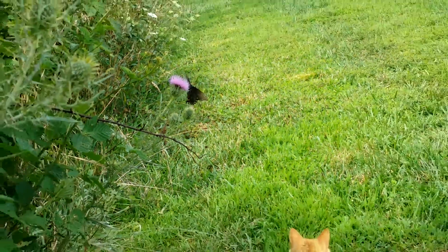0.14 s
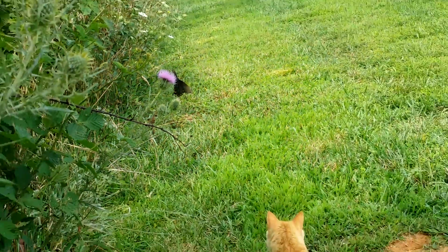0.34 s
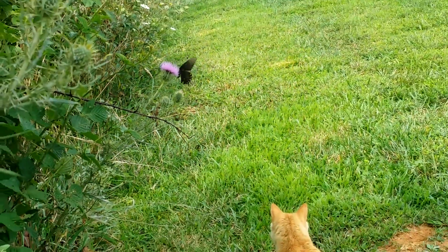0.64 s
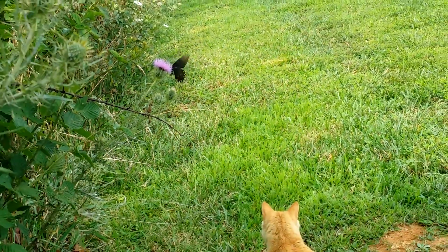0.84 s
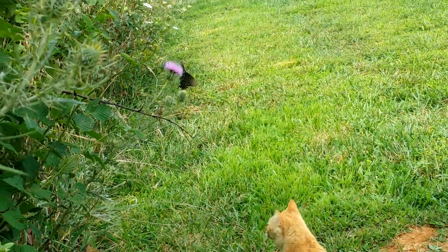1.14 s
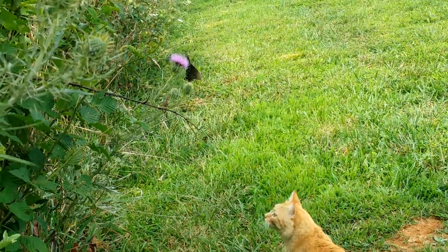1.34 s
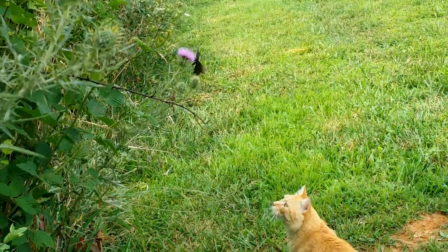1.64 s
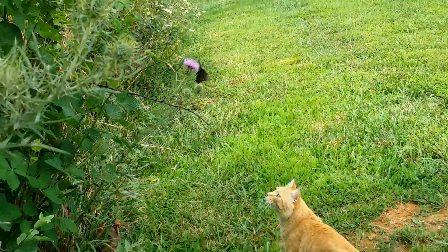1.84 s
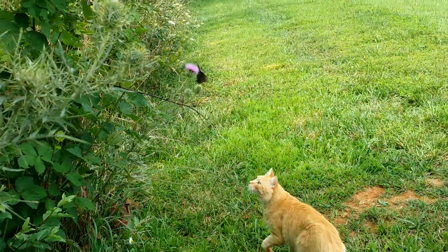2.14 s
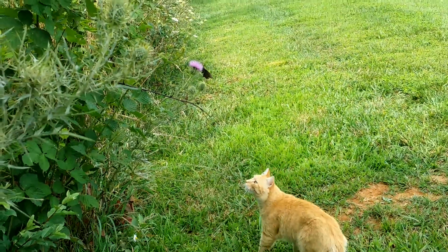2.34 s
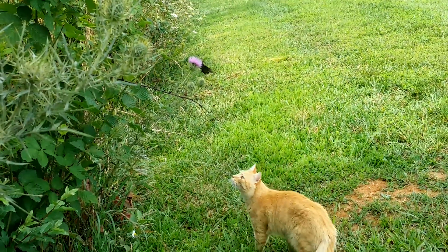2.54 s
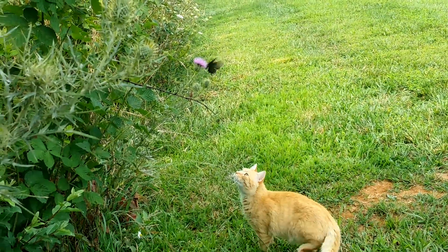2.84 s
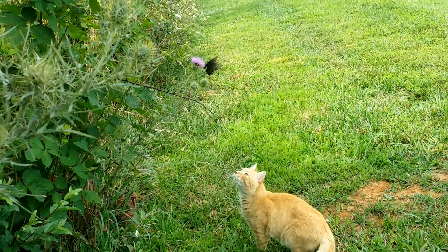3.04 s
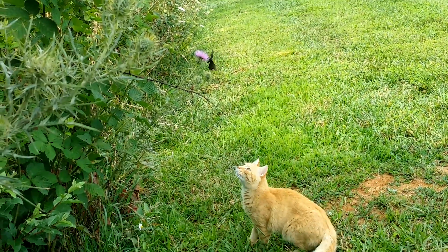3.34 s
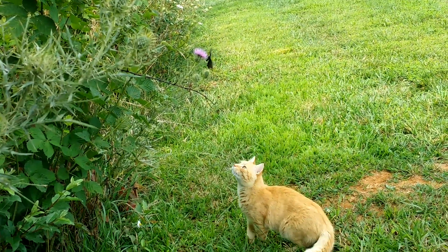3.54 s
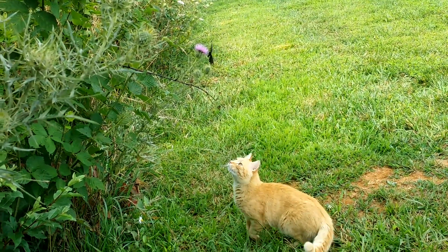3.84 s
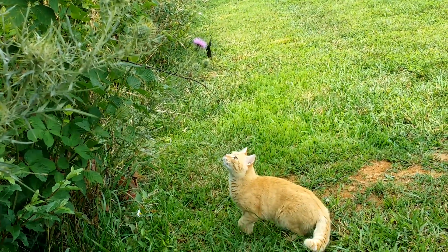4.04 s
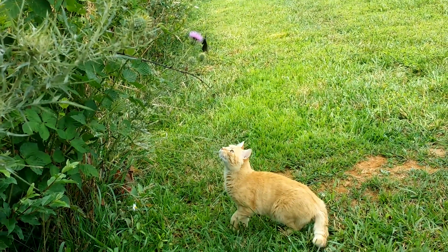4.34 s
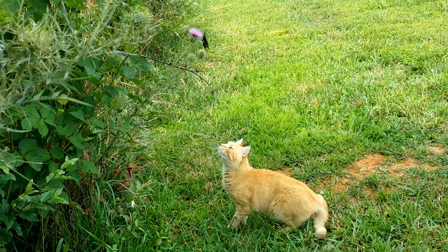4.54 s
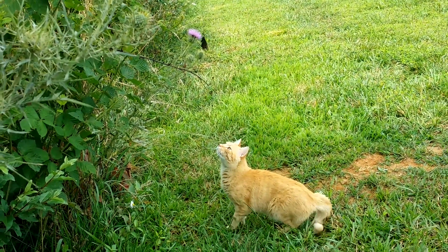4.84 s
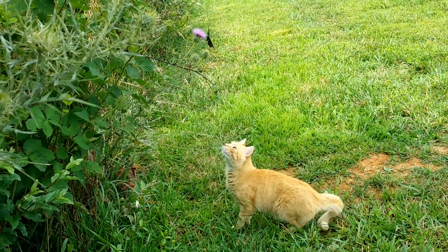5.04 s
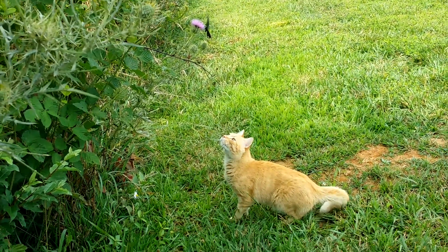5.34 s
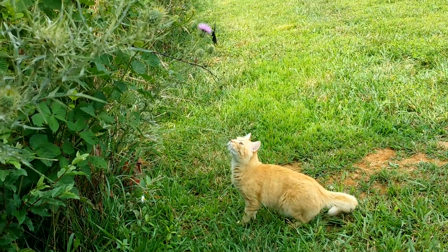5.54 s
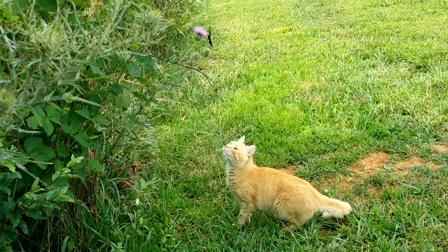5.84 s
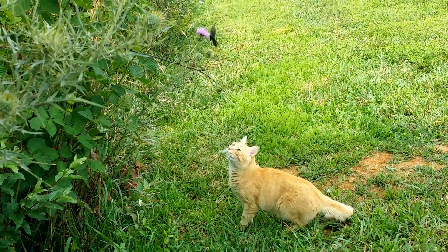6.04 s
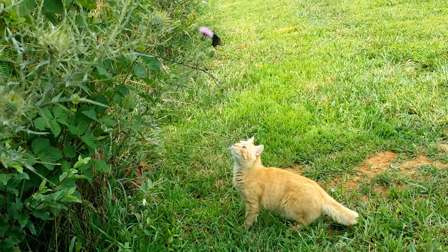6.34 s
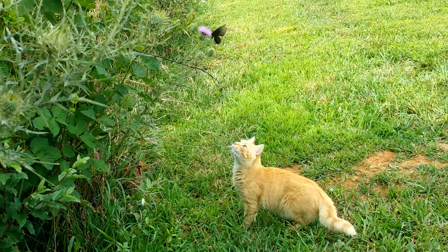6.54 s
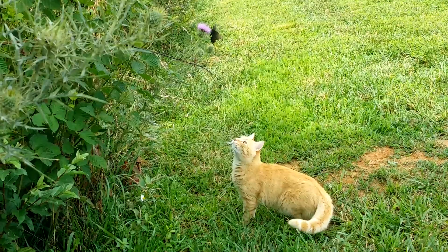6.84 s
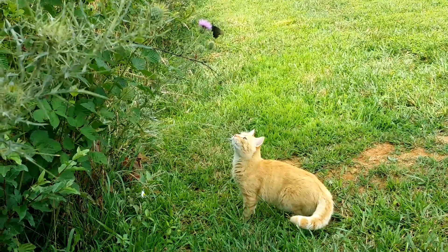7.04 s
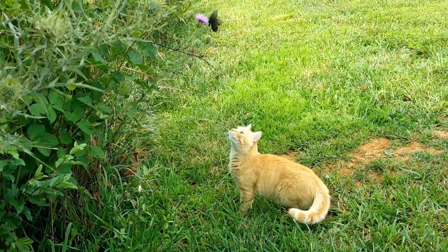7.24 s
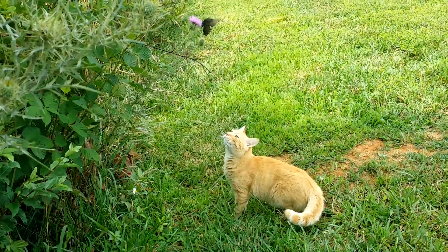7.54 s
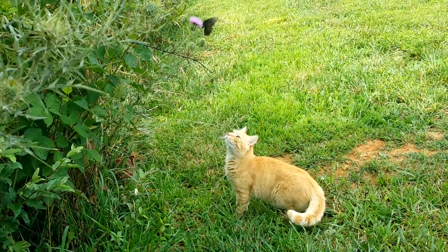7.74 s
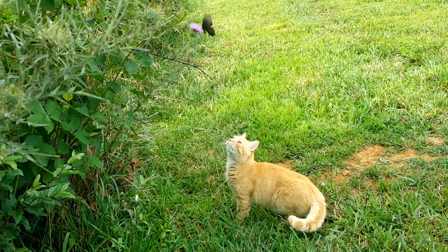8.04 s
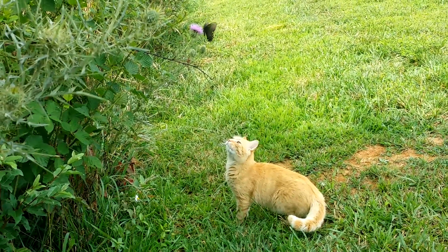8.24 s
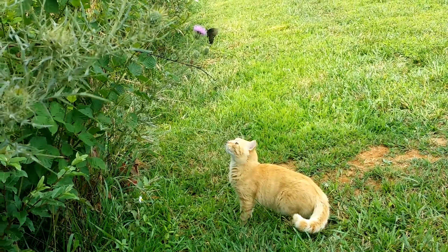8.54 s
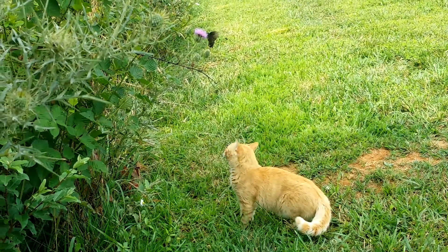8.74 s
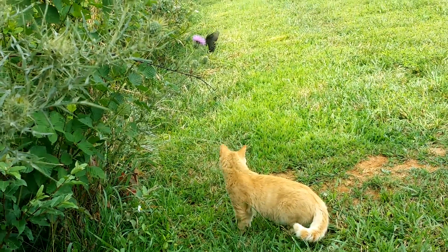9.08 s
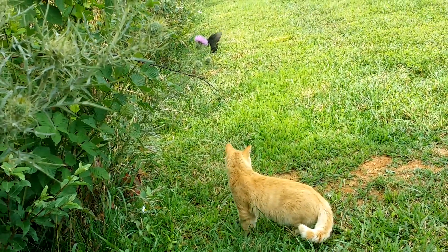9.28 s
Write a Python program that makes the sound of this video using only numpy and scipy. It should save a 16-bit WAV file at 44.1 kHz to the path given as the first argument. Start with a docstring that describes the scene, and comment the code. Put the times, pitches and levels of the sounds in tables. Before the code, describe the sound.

Shimmering summer insects drone steadily outdoors while a bird squeaks and mews on the right, thin calls follow, and a few dry clicks knock nearby.

```python
"""A dense chorus of far insects and a near cricket's trill open a summer backyard; cicadas throb in the trees.
A bird mews in the hedge on the right after a short squeak, others give thin high calls, and dry leaves rustle.
The hand-held camera clicks a few times beside its right microphone; a far engine hums under the low air noise.
Insects in mass, leaves and air are shaped noise; crickets, birds and motors are wavering tones; clicks are pulses."""
import sys
import numpy as np
from scipy import signal
from scipy.fft import rfft, irfft, next_fast_len
from scipy.io import wavfile
from scipy.ndimage import uniform_filter1d, map_coordinates

SR = 44100
rng = np.random.default_rng(int(sys.argv[2]) if len(sys.argv) > 2 else 0)


def dump_mix(stems):
    """Bounce the given channels to the path in sys.argv[1] as a 16-bit WAV at rate SR."""
    frames = np.atleast_2d(stems).T  # one column per channel
    limited = np.clip(frames, -1, 1)  # hard clip at full scale
    pcm = np.round(limited * 32767).astype(np.int16)
    wavfile.write(sys.argv[1], SR, pcm)


N = 414981
TIME = np.arange(N) / SR  # seconds


def amp(db):
    """Decibels to gain."""
    return 10 ** (np.asarray(db) / 20)


def unit(x):
    """Scale to rms 1."""
    return x / np.sqrt(np.mean(x ** 2) + 1e-20)


def since(start):
    """Seconds since a moment, 0 before it."""
    return np.maximum(TIME - start, 0)


def along(points, hz):
    """Read a list of (Hz, value) points at any frequency, on a log axis."""
    point_hz, value = np.transpose(points)
    return np.interp(np.log(hz + 1), np.log(point_hz + 1), value)


def curves(rows):
    """One value per sample for each column after the time."""
    seconds, *columns = np.transpose(rows)
    return [np.interp(TIME, seconds, column) for column in columns]


def wobble(rate):
    """A smooth random curve through random points, rate points a second."""
    knots = rng.standard_normal(int(N * rate / SR) + 4)
    fine = np.linspace(0, len(knots) - 1, 10 * len(knots))
    smooth = map_coordinates(knots, [fine], order=2)
    return np.interp(TIME * rate, fine, smooth)


def filtered(x, response):
    """Multiply the spectrum of x by a response of frequency."""
    size = next_fast_len(N + 8192)
    spectrum = rfft(x, size) * response(np.fft.rfftfreq(size, 1 / SR))
    return irfft(spectrum, size)[..., :N]


def pan(lean_db):
    """Left and right gains of mean power 1 for a left-minus-right level difference."""
    gains = amp(np.array([lean_db, -np.asarray(lean_db)]) / 2).reshape(2, -1)
    return gains / np.sqrt(np.mean(gains ** 2, axis=0))


def rush(colour, alike):
    """Stereo noise of rms 1 that falls off steeply beyond its colour; alike = left-right likeness."""
    middle, side = rng.standard_normal((2, N))
    turn = np.arccos(np.clip(alike, -1, 1)) / 2
    pair = np.cos(turn) * middle + np.sin(turn) * np.array([side, -side])
    closed = [(colour[0][0] / 2, -120), *colour, (colour[-1][0] * 2, -120)]
    return unit(filtered(pair, lambda hz: amp(along(closed, hz))))


def wavering(hz, db):
    """The tone of a far motor, unsteady in level and phase."""
    level = amp(db + 2.8 * wobble(4))
    return level * np.sin(2 * np.pi * hz * TIME + hz / 300 * wobble(22))


# How long the yard's scatter rings. Each row: frequency in Hz, time to fade by 60 dB in seconds.
YARD_FADE = [(200, 0.32), (2500, 0.7), (5000, 0.88), (8000, 0.51), (15000, 0.21)]


def yard(x):
    """Scatter from hedge and trees: fading noise, different at each microphone."""
    hz, t, cells = signal.stft(rng.standard_normal((2, SR)), SR, nperseg=256)
    fade = amp(-60 * t / along(YARD_FADE, hz)[:, None])
    tail = signal.istft(cells * fade, SR, nperseg=256)[1]
    return signal.oaconvolve(x[None], tail / np.linalg.norm(tail[0]), axes=1)[:, :N]


def foliage(x, t60):
    """Quick scatter from things around a source: noise that fades by 60 dB in t60 seconds."""
    t = np.arange(SR // 8) / SR
    tail = rng.standard_normal((2, len(t))) * amp(-60 * t / t60)
    return signal.oaconvolve(x[None], tail / np.linalg.norm(tail[0]), axes=1)[:, :N]


LEFT_LAG_S = .00045  # sound from the right reaches the left microphone later


def from_right(x):
    """The direct sound of a source on the right, at both microphones."""
    return np.array([np.roll(x, round(LEFT_LAG_S * SR)), x])


# Noise colours of the low rumble, far traffic, light breeze and hiss.
# Each row: frequency in Hz, relative level in dB per Hz.
RUMBLE_COLOUR = [(12, -26), (20, 3), (70, -1.5), (97, -6), (128, -10.5), (178, -29), (200, -24.5),
                 (260, -38), (440, -120)]
TRAFFIC_COLOUR = [(80, -41), (150, 5), (300, -2.5), (420, -2), (560, -14), (1000, -39)]
BREEZE_COLOUR = [(400, -12.5), (650, -1.5), (900, -1), (1300, -15.5), (2200, -23)]
HISS_COLOUR = [(500, -1.5), (1500, -3), (2500, 1), (4000, -1.5), (11000, -7.5), (15700, -7)]
# The breeze as it comes and goes. Each row: time in seconds, level in dB before a small lift.
BREEZE_COURSE = [(0.0, -66), (0.29, -67), (1.67, -59), (2.1, -67.5), (2.78, -63.5), (3.56, -67),
                 (3.82, -62), (5.16, -66.5), (7.08, -59.5), (7.28, -62.5), (8.57, -66), (8.99, -55),
                 (9.23, -63.5), (9.41, -66)]
# Low tones of far motors. Each row: frequency in Hz, relative level in dB.
MOTOR_TONES = [(270, -0.5), (312, -0.5), (385, -3.5)]
RUMBLE_DB, TRAFFIC_DB = -46.5, -55.5
BASS_ALIKE = .83  # left-right likeness of the rumble
# a far vehicle goes by: nearest moment, time to half power, level there
PASS_S, PASS_WIDTH_S, PASS_DB = 7.28, 0.35, -59.5
# a higher tone of the far traffic; it swings wider than the breeze that carries it (dB for each dB)
WHINE_HZ, WHINE_DB, WHINE_GROWS = 645, -68.5, 1.63


def air(breeze_lift_db=0.75, motors_db=-68, passing_motor_db=-1.5):
    """Low rumble, far traffic with one vehicle going by, a light breeze that carries a whine over, and an even hiss."""
    rumble_db = RUMBLE_DB + 0.27 * wobble(1.48) + .5 * wobble(9.8)
    rumble = amp(rumble_db) * rush(RUMBLE_COLOUR, alike=BASS_ALIKE)

    passing = amp(PASS_DB) / np.hypot(1, (TIME - PASS_S) / PASS_WIDTH_S)
    road = np.hypot(amp(TRAFFIC_DB), passing) * rush(TRAFFIC_COLOUR, alike=0.78)
    motor_level = amp(motors_db) + amp(passing_motor_db) * passing
    motors = motor_level * sum(wavering(hz, db) for hz, db in MOTOR_TONES)

    breeze_db, = curves(BREEZE_COURSE)
    breeze = amp(breeze_db + breeze_lift_db) * rush(BREEZE_COLOUR, alike=0.68) * pan(2.5)
    whine = wavering(WHINE_HZ, WHINE_DB + WHINE_GROWS * (breeze_db - breeze_db.mean()))
    hiss = amp(-54.0) * rush(HISS_COLOUR, alike=0.012) * pan(-1.1)
    return rumble + road + motors + breeze + whine + hiss


# The far engine as it swells and fades. Each row: time in seconds, level in dB before a small gain.
ENGINE_COURSE = [(0.0, -59), (0.81, -58), (3.67, -64.5), (4.19, -57.5), (5.37, -57.5), (5.84, -52.5),
                 (7.65, -50.5), (8.41, -55), (9.41, -47.5)]
# Tones of its hum. Each row: multiple of the firing rate, relative level in dB.
ENGINE_TONES = [(1, -7.5), (2, 3), (3, -12), (4, -7), (5, -20.5), (6, -23)]


def engine(firing_hz=66.44, gain_db=1.0):
    """A far engine, only the lowest multiples of its drifting firing rate carrying across the fields."""
    phase = 2 * np.pi * np.cumsum(firing_hz * (1 + 0.00609 * wobble(2))) / SR
    hum = sum(amp(db + 2.3 * wobble(2)) * np.sin(k * phase) for k, db in ENGINE_TONES)
    level_db, = curves(ENGINE_COURSE)
    return unit(hum) * amp(level_db + gain_db)


# The chorus over time. Each row: time in seconds, level in dB before a small lift.
CHORUS_COURSE = [(0, -36), (1, -36), (2.6, -36), (6.5, -34), (9.41, -34.5)]
# Its noise colour. Each row: frequency in Hz, relative level in dB per Hz.
CHORUS_BAND = [(3400, -23), (4400, -20), (5300, -10), (5850, -4), (6150, 0.5), (6800, 3.5), (7450, 0.5),
               (7750, -6), (8050, -9), (8400, -14), (8800, -21.5), (9800, -26), (10700, -36.5),
               (15000, -35)]
# Where each part of the band sits. Each row: frequency in Hz, left-minus-right dB on top of the overall lean.
CHORUS_SIDES = [(4000, 2.5), (6000, 7.5), (6800, -2), (7400, 2.5), (8200, -5.5), (9500, -25), (11000, -3)]
CHORUS_LEAN_DB = -6.5  # overall lean, left minus right


def chorus(flutter=0.052, lift_db=2):
    """Countless far insects merge into a band; the nearest of them lend it a faint flutter."""
    level_db, = curves(CHORUS_COURSE)
    noise = rush(CHORUS_BAND, alike=0.011)
    band = unit(filtered(noise, lambda hz: pan(along(CHORUS_SIDES, hz))))
    fluttering = 1 + flutter * np.sin(2 * np.pi * 41 * TIME + wobble(2.0))
    return band * fluttering * amp(level_db + lift_db) * pan(CHORUS_LEAN_DB)


# Crickets further off. Each row: pitch in Hz, wing strokes a second, level in dB, left-minus-right dB.
FAR_CRICKETS = [(6160, 38, -49, 14), (7520, 34, -44.5, -19), (8050, 25, -52, -22)]


def singers(spread_hz=70):
    """A few crickets stand out of the band, their strokes smeared by the grass."""
    out = np.zeros((2, N))
    for hz, strokes, db, lean_db in FAR_CRICKETS:
        stroke = 1 + np.sin(2 * np.pi * strokes * TIME + wobble(1.996))
        phase = 2 * np.pi * np.cumsum(hz + spread_hz * wobble(200)) / SR
        tone = unit(stroke * np.sin(phase))
        out += unit(foliage(tone, t60=0.11)) * amp(db + wobble(1.5)) * pan(lean_db)
    return out


# Noise colours of the grinding cicada and the fast-throbbing one.
# Each row: frequency in Hz, relative level in dB per Hz.
GRINDER_COLOUR = [(2800, -33), (3600, -5), (4500, 6), (5400, 9.5), (6500, -9), (9000, 0), (12000, -35)]
THROBBER_COLOUR = [(2400, -17), (3300, 1.5), (4200, 3.5), (5200, -6), (7000, -22)]
# the grinder: one crest of its song, swells a second there, and how fast they quicken
CREST_S, SWELL_HZ, QUICKEN_HZ_PER_S = 3.303, 2.29, .155
# crest level of its full song, its start, its time to build
GRINDER_DB, GRINDER_START_S, GRINDER_RISE_S = -42, 2.66, 1.83
THROBBER_DB, THROBBER_STOP_S, THROBBER_FADE_DB_PER_S = -54, 2.1, 28


def cicadas(trough_db=-9, throb_db=0.5):
    """One far cicada builds up and grinds in quickening swells; another throbs fast and faintly and winds down."""
    t = TIME - CREST_S
    cycle = SWELL_HZ * t + QUICKEN_HZ_PER_S * t ** 2 / 2
    effort = 1 - np.exp(-since(GRINDER_START_S) / GRINDER_RISE_S)
    swell = effort * amp(GRINDER_DB + trough_db * np.abs(np.sin(np.pi * cycle)))
    grinder = swell * rush(GRINDER_COLOUR, alike=0.13) * pan(-6.5)

    fading_db = THROBBER_DB - THROBBER_FADE_DB_PER_S * since(THROBBER_STOP_S)
    throb = amp(fading_db + throb_db * np.sin(2 * np.pi * 7.3 * TIME))
    return grinder + throb * rush(THROBBER_COLOUR, alike=0.11) * pan(0.26)


# Dry rustles in the hedge. Each row: start in seconds, length in seconds, level in dB.
LEAF_RUSTLES = [(5.03, .03, -58), (5.23, .02, -43), (5.22, 0.21, -42.5), (5.4, 0.49, -47),
                (6.63, 0.043, -43), (6.986, .04, -36), (7.478, .012, -38)]


def rustles(crackle_db=4):
    """Dry leaves brush each other in short crackling spurts."""
    envelope = sum(amp(db) * np.sin(np.pi * np.clip((TIME - s) / length, 0, 1))
                   for s, length, db in LEAF_RUSTLES)
    noise = rush([(5000, 8), (9000, -2), (15000, -13)], alike=.2)  # Hz, relative dB per Hz
    grains = unit(amp(crackle_db * wobble(540)) * noise)
    return envelope * grains * pan(-9)


# Thin bird calls; the first row is the squeak that opens the near bird's mew.
# Each row: start in seconds, length in seconds, start pitch in Hz, end pitch in Hz,
# level in dB, bend (1 is a straight sweep, more sweeps early).
SQUEAK_AND_THIN_CALLS = [(1.13, 0.033, 2600, 2820, -35, 0.95), (1.55, 0.14, 8700, 7900, -37.5, 1.1),
                         (2.549, .14, 8300, 8280, -29, 1), (4.256, 0.044, 5180, 8200, -25.5, 3.2),
                         (5.499, 0.1, 8610, 8270, -33.5, 0.96), (6.02, .1, 8280, 8060, -26.5, 1.2),
                         (6.995, 0.031, 5600, 8210, -14.5, 2.4), (7.595, 0.076, 8620, 8400, -32, 0.98),
                         (7.639, 0.08, 8430, 8330, -26, 0.94), (7.835, 0.06, 8530, 7830, -28, 0.85),
                         (8.45, 0.061, 8070, 8240, -27, 1.6)]


def chirps(overtone_db=-30):
    """The near mew's opening squeak, then other birds' thin calls: wavering tones with a faint overtone."""
    song, waver_hz = np.zeros(N), 35 * wobble(250)
    for s, length, start_hz, end_hz, db, bend in SQUEAK_AND_THIN_CALLS:
        on = (TIME > s) & (TIME < s + length)
        u = (TIME[on] - s) / length
        hz = end_hz + (start_hz - end_hz) * (1 - u) ** bend + waver_hz[on]
        phase = 2 * np.pi * np.cumsum(hz) / SR
        tone = np.sin(phase) + amp(overtone_db) * np.sin(2 * phase)
        song[on] += amp(db) * np.sin(np.pi * u) ** 2 * tone
    return (song + amp(1) * foliage(song, t60=0.14) + amp(-7) * yard(song)) * pan(-17.0)


# The near cricket's bouts. Each row: start in seconds, end in seconds, settled pitch in Hz.
CRICKET_BOUTS = [(-.019, .58, 7920), (1.481, 9.0, 7819)]
# Its level and place. Each row: time in seconds, tone level in dB, left-minus-right dB.
CRICKET_COURSE = [(0, -39, -20), (1.5, -44.5, -13), (3.7, -36, -18), (6.2, -40.5, -11), (8, -45.5, -1),
                  (9, -41.5, -1)]
STROKE_HZ = 27  # wing strokes a second
COLD_FLAT_HZ, WARM_UP_S = 98.7, 0.83  # a bout starts flat and rises to its pitch


def cricket(scatter_db=-1, droop_hz=1300):
    """Each wing stroke swells into a tone, then sags in pitch as the wing slows."""
    level_db, lean_db = curves(CRICKET_COURSE)
    stroke, pitch_hz = np.zeros((2, N))
    for start, end, settled_hz in CRICKET_BOUTS:
        on = (TIME > start) & (TIME < end)
        age = TIME[on] - start
        stroke[on] = age * STROKE_HZ % 1  # 0 to 1 through each stroke
        pitch_hz[on] = settled_hz - COLD_FLAT_HZ * np.exp(-age / WARM_UP_S)
    swell = np.abs(np.cos(np.pi * (stroke - .44))) ** 1.72
    hz = pitch_hz - droop_hz * np.maximum(stroke - .3, 0) ** 2 + 30 * wobble(400)
    song = unit(swell * np.sin(2 * np.pi * np.cumsum(hz) / SR))
    tone = amp(level_db + wobble(27)) * song
    scatter = foliage(tone, t60=0.074)
    scatter *= np.std(tone) / np.std(scatter, axis=1, keepdims=True)
    return (tone + amp(scatter_db) * scatter) * pan(lean_db)


# Handling clicks. Each row: time in seconds, knock strength in dB before a later gain, snap strength in dB.
CAMERA_CLICKS = [(.449, -20.5, -56), (0.8302, -22, -13.5), (.882, -10, -38), (.929, -10, -38),
                 (1.459, -21, -56), (1.4996, -22, -14.5), (8.894, -15.5, -38), (8.9856, -24, -52),
                 (9.1598, -21, 0), (9.1623, -20, -8.5), (9.222, -18, -48)]


def clicks(push_s=0.00027, softening=0.64, shell_hz=7900, shell_t60=0.0012, body_hz=1050, body_db=-17):
    """Each click is one short push on the camera body, duller when gentle, plus a snap of its plastic shell."""
    out, t = np.zeros(N), np.arange(SR // 50) / SR
    snap = np.sin(2 * np.pi * shell_hz * t) * amp(-60 * t / shell_t60)
    snap -= np.sin(2 * np.pi * body_hz * t) * amp(body_db - 60 * t / 0.0087)
    for s, knock_db, snap_db in CAMERA_CLICKS:
        # a gentler push lasts longer and sets in more slowly
        u = t / (push_s * amp(-softening * (knock_db + 13.0)))
        onset = 1 - np.exp(-u / (0.19 * amp(-softening * knock_db)))
        push = (1 - u) * np.exp(-u) * onset
        grit = 0.31 * uniform_filter1d(rng.standard_normal(len(t)), size=2) * amp(-60 * t / 0.0038)
        out[round(s * SR):][:len(t)] += amp(snap_db) * (snap + grit) - amp(knock_db + 7.5) * push
    return (from_right(out) + amp(-16) * foliage(out, t60=0.058)) * pan(-45)


BEAK_HZ = 2600  # the open beak brightens the call above this


def syrinx(t, pitch_hz, rough, bright_db, throat, rasp=0.033):
    """One side of a bird's voice: jittering harmonics through a fixed throat."""
    def jitter(rate):
        """Random values joined by straight lines, rate values a second."""
        return np.interp(t * rate, np.arange(SR // 20), rng.standard_normal(SR // 20))

    shake = 0.0039 * jitter(118.3) + rasp * rough * jitter(700)
    phase = 2 * np.pi * np.cumsum(pitch_hz * (1 + shake)) / SR
    k = np.arange(1, 19)[:, None]  # harmonic numbers
    octaves_above = np.log2(np.maximum(k * (pitch_hz / BEAK_HZ), 1))
    flicker_db = 2.8 * np.array([jitter(77.2) for _ in k])
    harmonics = amp(along(throat, k * pitch_hz) + bright_db * octaves_above + flicker_db)
    return np.sum(harmonics * np.sin(k * phase), axis=0) / np.linalg.norm(harmonics, axis=0)


MEW_ATTACK_S, MEW_RELEASE_S, MEW_SAG_DB_PER_S = 0.087, 0.027, 33.5
MEW_FALL_POWER = 2.5  # the pitch holds at first, then drops ever faster
MEW_ROUGHENS, MEW_OPENS_DB = 0.83, 3  # roughness and brightness (dB an octave) gained over a call


def mew(start, length, hz, fall, db, rough, bright_db, throat, second_pitch=.94, second_db=-24):
    """A nasal call: it swells and brightens as the beak opens, then sags, falls in pitch and turns to a rasp."""
    on = (TIME > start) & (TIME < start + length)
    t = TIME[on] - start
    slack = (t / length) ** MEW_FALL_POWER
    pitch_hz = hz * (1 - fall * slack)
    rough = np.clip(rough + MEW_ROUGHENS * slack, 0, .9)
    bright_db = bright_db + MEW_OPENS_DB * t / length
    envelope = np.minimum(t / MEW_ATTACK_S, 1) * np.minimum((length - t) / MEW_RELEASE_S, 1)
    envelope *= amp(db + 4 - MEW_SAG_DB_PER_S * np.maximum(t - MEW_ATTACK_S, 0))
    first = syrinx(t, pitch_hz, rough, bright_db, throat)
    # the other half of the syrinx sings slightly flat, and joins in as the call grows rough
    second = syrinx(t, pitch_hz * second_pitch, rough / 2, bright_db, throat)
    voice = np.zeros(N)
    voice[on] = envelope * (first + amp(second_db * (1 - rough)) * second)
    return voice


# Mewing calls. Each row: start in seconds, length in seconds, pitch in Hz, share by which it falls,
# level in dB before a 4 dB lift, roughness at the start from 0 to 1,
# brightness at the start in dB an octave, place.
MEW_CALLS = [ (1.134, .3, 820.6, 0.1, -22.5, 0.18, -2, "hedge"),
             (2.812, .3, 896, .07, -49.5, .85, -13, "far"),
             (3.059, .23, 817.5, .05, -46.5, 0.23, -0.5, "far"),
             (8.71, 0.178, 815, 0.022, -55, 0.27, -31, "far")]
# Throats of the near and the far bird. Each row: frequency in Hz, relative gain in dB.
NEAR_THROAT = [(800, -42), (1640, -23.5), (2450, -13.5), (2850, 0), (3270, 0.5), (4100, -17), (4900, -8),
               (5750, -3), (6550, -6), (7400, -12.5), (8200, -1.5), (9000, -28.5), (11500, -24.5),
               (15000, -39)]
DISTANT_THROAT = [(800, -51), (1700, -22.5), (2650, -9.5), (3400, -6.5), (4050, 6), (4500, 0), (4900, 2),
                  (7000, -14), (10000, -35)]


def mewing():
    """The near bird sits in the hedge; the far one is heard only by its echoes."""
    near = sum(mew(*call, NEAR_THROAT) for *call, place in MEW_CALLS if place == "hedge")
    far = sum(mew(*call, DISTANT_THROAT) for *call, place in MEW_CALLS if place == "far")
    direct = amp(-1.0) * from_right(near)
    hedge = (direct + amp(1.0) * foliage(near, t60=0.083) + amp(-6.5) * yard(near)) * pan(-10)
    return hedge + amp(-1) * foliage(far, t60=0.091) + amp(-3.5) * yard(far)


def scene():
    """Everything in the yard, left and right."""
    background = air() + engine()
    insects = chorus() + singers() + cicadas() + cricket()
    return background + insects + rustles() + chirps() + clicks() + mewing()


TOP_HZ = 15780  # the camera's band limit


def record(dry):
    """The camera input flattens peaks beyond full scale and keeps nothing above its band limit."""
    return filtered(np.clip(dry, -1, 1), lambda hz: hz < TOP_HZ)


dry = scene()
out = record(dry)
dump_mix(out)
```